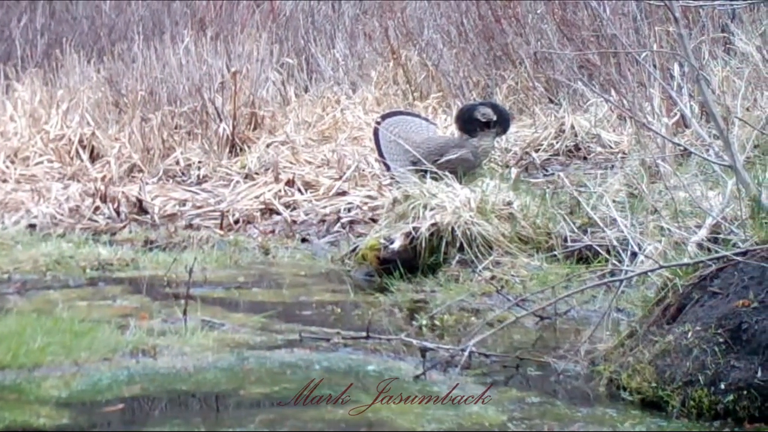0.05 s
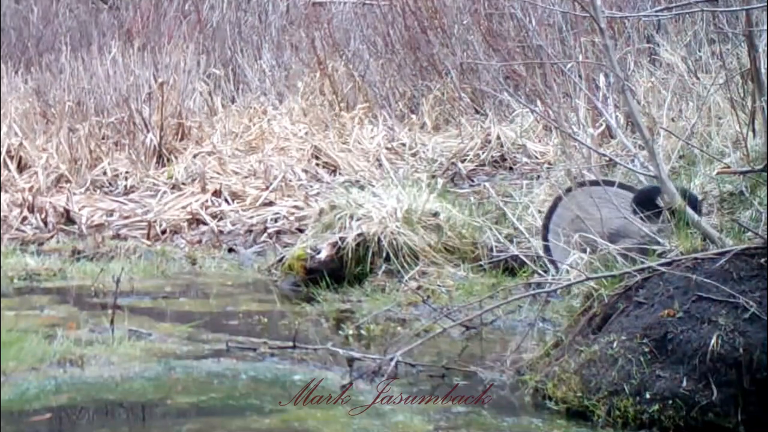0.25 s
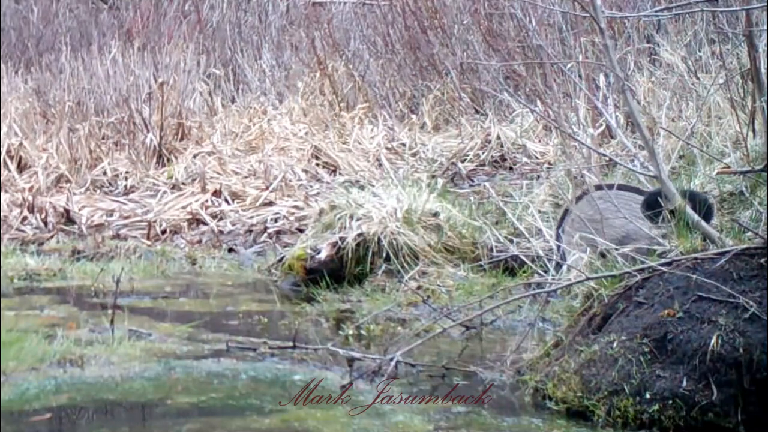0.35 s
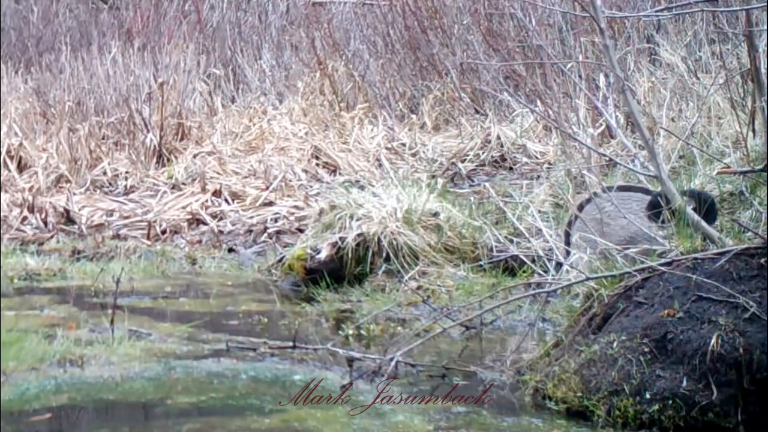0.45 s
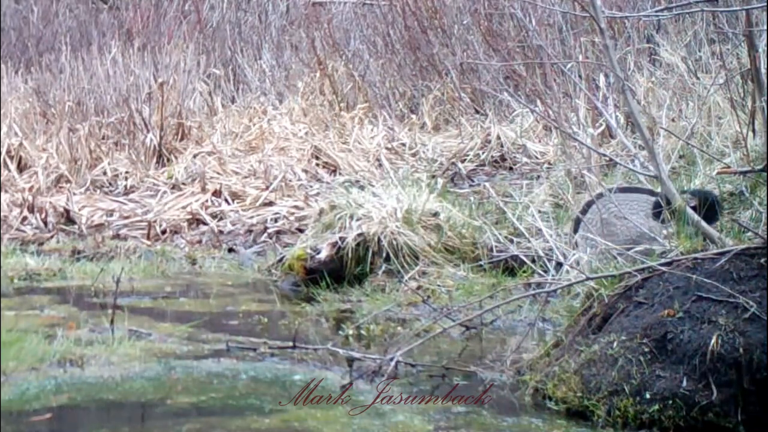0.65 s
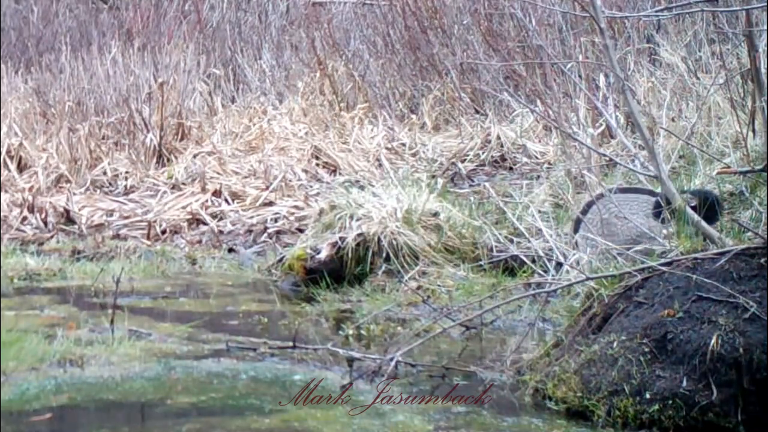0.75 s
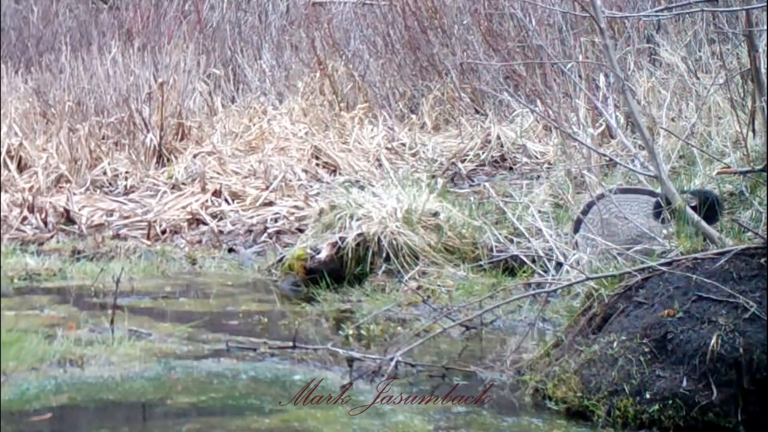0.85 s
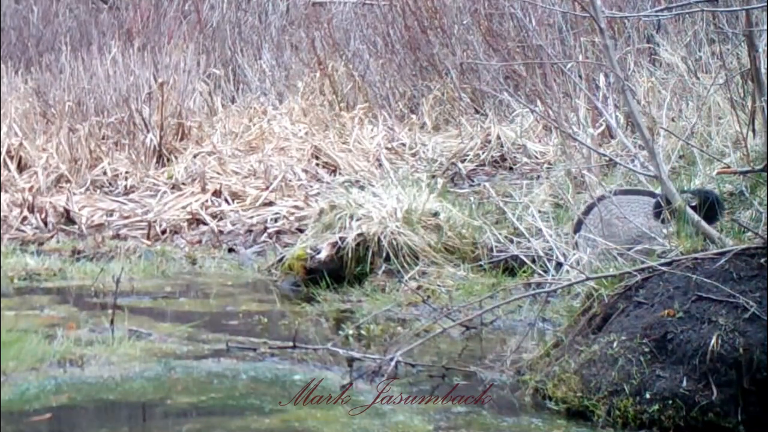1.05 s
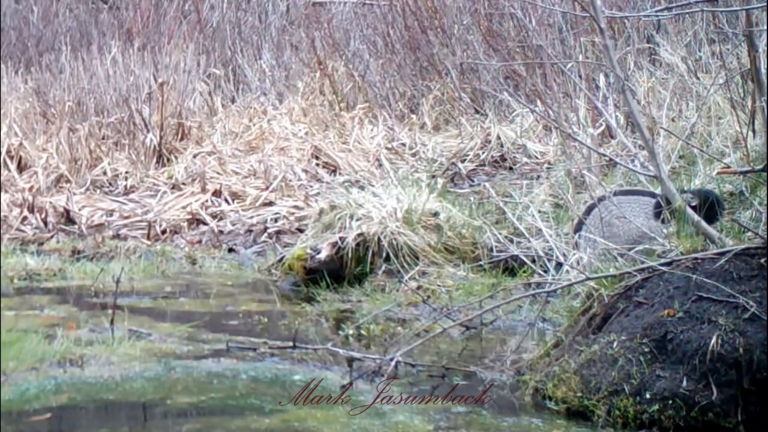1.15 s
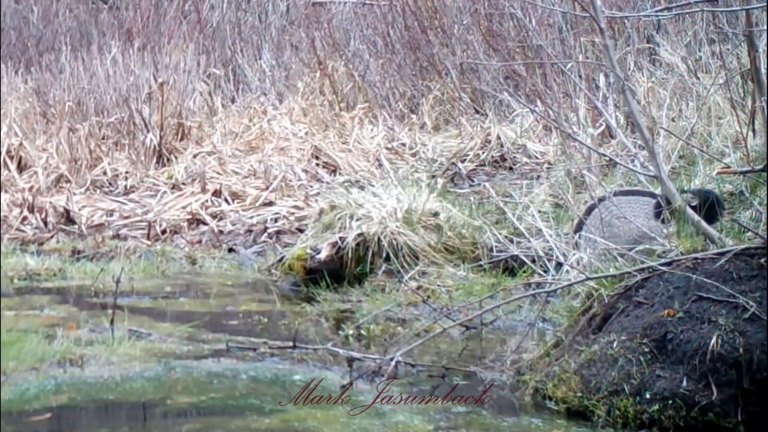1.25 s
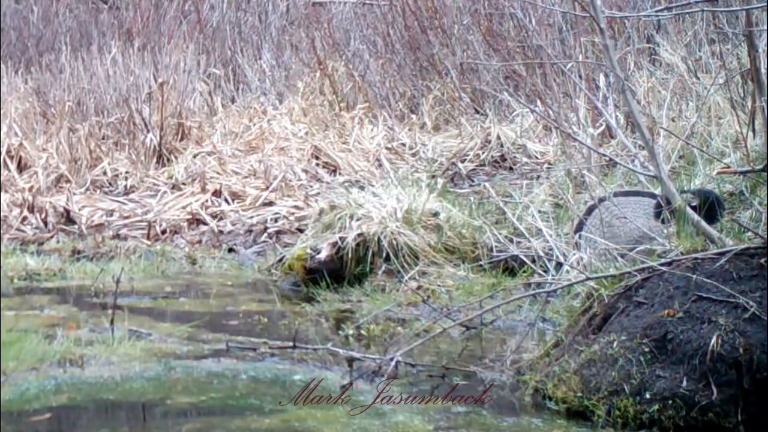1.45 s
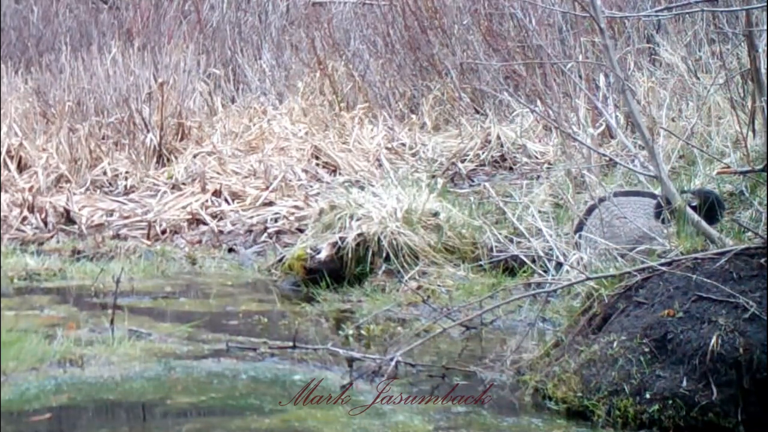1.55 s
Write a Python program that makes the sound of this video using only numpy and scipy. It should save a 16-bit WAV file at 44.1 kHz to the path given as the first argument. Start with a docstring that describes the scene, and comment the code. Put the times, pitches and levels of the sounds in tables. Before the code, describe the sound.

A grouse beats its wings five times in a quick, thumping, swishing flurry, then its steps crunch on through dry grass. A small bird whistles thin notes farther off, over soft outdoor air and faint trickling marsh water.

```python
"""A grouse rushes along a marsh edge with five wingbeats: each swishes the feathers and shoves a thump
of air. Its steps crunch through dry grass while a small bird whistles thin notes that echo off the trees.
Underneath lies a bed of outdoor air, trickling water and mains buzz. The recorder samples coarsely,
which mirrors the whistles into the treble.
An edit cuts the sound to silence for a moment just before the rush."""
import sys
import numpy as np
from scipy import signal
from scipy.fft import rfft, irfft
from scipy.io import wavfile

SR = 44100
rng = np.random.default_rng(int(sys.argv[2]) if len(sys.argv) > 2 else 0)


def store_wav(level_fs):
    """Save 16-bit WAV to argv[1]."""
    pcm = np.round(np.clip(np.atleast_2d(level_fs), -1, 1) * 32767)
    wavfile.write(sys.argv[1], SR, pcm.T.astype(np.int16))


N = 70560
T = np.arange(N) / SR

# tone of the outdoor air: frequency_hz, gain_db
AIR_EQ = [(25, 4.5), (70, 0.5), (130, 0), (250, -3), (450, -7.5), (900, -8), (1300, -11.5), (2000, -12.5),
          (3200, -17), (4000, -17)]
# partials of the mains buzz: harmonic_number, level_db
BUZZ_PARTIALS = [(4, -66), (5, -64.5), (6, -76.5), (7, -67), (8, -69), (9, -68), (10, -73), (11, -72),
                 (14, -68), (15, -81), (16, -75.5)]
# the small bird's phrase: start_s, end_s, pitch_hz, start_offset_hz, glide_s, level_db
WHISTLES = [(0.264, 0.345, 3211, 700.5, .007, -47), (0.387, 0.453, 3220, 99.5, 0.0064, -48),
            (0.541, 0.613, 3253, 599.5, .007, -47.5), (0.675, 0.71, 3272, -550, 0.00853, -44.5),
            (0.814, 0.891, 3284, 1250, .008, -47)]
# slapback off near trunks: delay_s, gain_db
TRUNK_ECHOES = [(0.042, -14), (.062, -15.5)]
# steps and snaps in dry grass: start_s, level_db, decay_s, centre_hz, crack_db
CRUNCHES = [(0.222, -36, 0.006, 600, -26), (0.307, -41, 0.0029, 1800, -11.5),
            (0.343, -33, 0.0028, 590, -13), (0.3782, -28.5, 0.0028, 813, -6.5),
            (0.509, -45, 0.002, 2400, -18), (0.549, -38, 0.012, 480, -12), (0.7000, -40, 0.0073, 1980, -28),
            (0.717, -36, 0.0032, 1400, 1), (0.782, -46, .004, 600, -10), (0.9365, -39, 0.015, 880, -17),
            (0.9845, -36.5, 0.0044, 1230, -22), (1.0753, -42.5, 0.0094, 1290, -11),
            (1.1031, -42, 0.0059, 1760, -22), (1.2402, -38, 0.0047, 1300, -8.5),
            (1.411, -51, 0.032, 1720, -22), (1.5203, -38, 0.0038, 1220, -27)]
# tone of brushed grass: frequency_hz, gain_db
GRASS_EQ = [(100, 6), (220, -10), (450, 6), (800, -8), (1400, -7.5), (2200, -13.5), (3000, -10),
            (4000, -14.5)]
# rumble of stirred air: frequency_hz, gain_db
EDDY_EQ = [(20, 0), (60, 7), (120, 2), (200, -13.5), (800, -54)]
# body of the feather swish: frequency_hz, gain_db
FEATHER_EQ = [(200, -3), (600, 2.5), (1000, 4.5), (1500, 4.5), (2300, 8.5), (3000, 1.5), (4000, -0.5)]
# hiss of the wing tips: frequency_hz, gain_db
TIP_EQ = [(1500, -31), (2700, -2.5), (3600, 3), (4000, 0.5)]
# wing strokes: time_s, thump_db, swish_db, swish_lead_s, swish_width_s, tip_db
WINGBEATS = [(0.2589, -28.5, -42, 0.014, 0.02, -51), (0.3323, -23.5, -43.5, 0.015, 0.025, -51),
             (0.414, -25, -43, 0.016, 0.012, -43.5), (0.4928, -26, -43, 0.02, 0.0091, -45.5),
             (0.558, -36, -46, 0.012, 0.0064, -46.5)]

SAMPLING_HZ = 8000  # the recorder's coarse rate


def undb(db):
    """Decibels to gain."""
    return 10 ** (np.asarray(db) / 20)


def unit(x):
    """Scale to rms 1."""
    return x / np.sqrt(np.mean(x ** 2) + 1e-20)


def shaped_noise(db_at):
    """Noise of rms 1 below half the coarse rate; db_at gives its tone over log2 of the frequency."""
    octave = np.log2(np.maximum(np.fft.rfftfreq(N, 1 / SR), 1))
    gain = undb(db_at(octave)) * (octave < np.log2(SAMPLING_HZ / 2))
    return unit(irfft(rfft(rng.standard_normal(N)) * gain, N))


def eq_noise(eq):
    """Noise of rms 1 coloured by an EQ table."""
    hz, db = np.array(eq, float).T
    return shaped_noise(lambda octave: np.interp(octave, np.log2(hz), db))


def wobble(rate_hz):
    """Random modulation: levels joined by lines, spread near 1."""
    return 0.968 * np.interp(T * rate_hz, np.arange(N), rng.standard_normal(N))


def grain(depth_db, rate_hz):
    """A jittering gain of rms 1 that roughens a layer."""
    return unit(undb(depth_db * wobble(rate_hz)))


def outdoor_air(level_db=-49, flicker_db=0.42):
    """A dark, steady bed of air whose level flickers slightly."""
    return undb(level_db) * eq_noise(AIR_EQ) * undb(flicker_db * wobble(39.64))


def mains_buzz(mains_hz=60):
    """A faint stack of mains harmonics."""
    return sum(np.sqrt(2) * undb(db) * np.cos(2 * np.pi * harmonic * mains_hz * T)
               for harmonic, db in BUZZ_PARTIALS)


def trickle(level_db=-54.5, plops_per_s=230, centre_hz=715, spread_octaves=1.146, decay_cycles=2):
    """Running water: a scatter of tiny plops, each a quickly damped sine."""
    water, age = np.zeros(2 * N), T[:N // 40]
    for when, pitch, size in rng.random((int(plops_per_s * N / SR), 3)):
        hz = centre_hz * 2 ** (spread_octaves * (2 * pitch - 1))
        gain = undb(-0.5 * np.log(max(size, .02)))
        plop = np.sin(2 * np.pi * hz * age) * np.exp(-age * hz / decay_cycles)
        start = int(when * N)
        water[start:start + len(age)] += gain * plop
    return undb(level_db) * unit(water[:N])


def songbird(sag_hz_per_s=674, swell_s=0.044, ramp_s=0.0064, waver_hz=13.8, flutter_db=1.5):
    """Pure whistles slide onto their pitch, swell, sag and stop."""
    song, waver = np.zeros(N), waver_hz * wobble(89.06)
    for start, end, hz, offset_hz, glide, db in WHISTLES:
        age = np.maximum(T - start, 0)
        pitch = hz + offset_hz * np.exp(-age / glide) - sag_hz_per_s * age + waver
        gate = np.clip(np.minimum(age, end - T + ramp_s / 2) / ramp_s, 0, 1)
        swell = np.minimum(0.34 + (age / swell_s) ** 2, 1)
        song += np.sqrt(2) * undb(db) * gate * swell * np.sin(2 * np.pi * np.cumsum(pitch) / SR)
    return song * undb(flutter_db * wobble(120.6))


def among_trees(song, tail_db=-8, t60_s=1, far_db=-13.5, far_delay_s=0.15, far_width_s=0.027):
    """The song with slapback off near trunks, a woodland tail and a blur returning from far trees."""
    slapback = sum(undb(db) * np.interp(T - delay, T, song, left=0) for delay, db in TRUNK_ECHOES)
    tail = undb(tail_db) * unit(np.exp(-np.log(1000) * T / t60_s))
    far = undb(far_db) * unit(np.exp(-.5 * ((T - far_delay_s) / far_width_s) ** 2))
    impulse_response = np.hypot(tail, far) * rng.standard_normal(N) / np.sqrt(N)
    return song + slapback + signal.fftconvolve(song, impulse_response)[:N]


def grass_steps(attack_s=0.001, width_octaves=0.52):
    """Dry stalks crunch underfoot: short bursts, each a band of colour over a broad crack."""
    steps = np.zeros(N)
    for start, db, decay, hz, crack_db in CRUNCHES:
        def tone_db(octave):
            band = np.exp(-.5 * ((octave - np.log2(hz)) / width_octaves) ** 2)
            return 10 * np.log10(band + undb(crack_db) ** 2)
        age = np.maximum(T - start, 0)
        envelope = (1 - np.exp(-age / attack_s)) * np.exp(-age / decay)
        steps += undb(db) * envelope * shaped_noise(tone_db)
    return steps * grain(depth_db=1, rate_hz=900)


def wake(start_s=0.24, end_s=0.5, grass_db=-44.5, grass_fade_s=0.13, eddy_db=-42.5, eddy_fade_s=0.12):
    """Brushed grass rustles and stirred air rumbles through the rush, then both settle."""
    settling = np.maximum(T - end_s, 0)
    rustle = eq_noise(GRASS_EQ) * grain(depth_db=3, rate_hz=200)
    grass = undb(grass_db) * np.exp(-settling / grass_fade_s) * rustle
    eddies = undb(eddy_db) * np.exp(-settling / eddy_fade_s) * eq_noise(EDDY_EQ)
    return (T > start_s) * (grass + eddies)


def wingbeats(suck_s=0.0062, turn_s=0.0024, push_s=0.0053, sway_s=0.022, sway_db=-38.5, tip_s=0.0062):
    """Each stroke swishes, hisses at the tips, draws air in and turns it into a thumping push."""
    air, swish, tips = np.zeros((3, N))
    for time, thump_db, swish_db, lead, width, tip_db in WINGBEATS:
        age = T - time
        suck, push = 0.78 * np.exp(-abs(age) / suck_s), np.exp(-abs(age) / push_s)
        air += 2 * undb(thump_db) * np.tanh(age / turn_s) * np.where(age < 0, suck, push)
        air += 2 * undb(sway_db) * age / sway_s * np.exp(-(age / sway_s) ** 2)  # slow swing of air
        swish += undb(swish_db) * np.exp(-.5 * ((age + lead) / width) ** 2)
        tips += undb(tip_db) * np.exp(-.5 * ((age + lead) / tip_s) ** 2)
    feathers = swish * eq_noise(FEATHER_EQ) + tips * eq_noise(TIP_EQ)
    return air + feathers * grain(depth_db=3, rate_hz=700)


def scene():
    """The mono mix: grouse in front, songbird in the trees, marsh bed underneath."""
    grouse = wingbeats() + wake() + grass_steps()
    return (grouse + among_trees(songbird()) + trickle() + outdoor_air() + mains_buzz())[None]


def record(dry, roll_off_hz=3670, top_hz=15700, cut_start_s=0.198, cut_end_s=0.2222):
    """Coarse samples joined by lines mirror the sound into the treble; an edit cuts a brief silence."""
    count = round(N * SAMPLING_HZ / SR)
    bins, times = np.arange(count // 2 + 1), np.arange(count) / SAMPLING_HZ
    roll_off = 1 / np.sqrt(1 + (bins * SR / N / roll_off_hz) ** 20)
    droop = np.sinc(bins / count) ** 2  # the lines dull the highs; dividing by this keeps them level
    coarse = irfft(rfft(dry[0])[bins] * roll_off / droop, count) * count / N
    edit_gate = (times < cut_start_s) | (times > cut_end_s)
    joined = np.interp(T, times, coarse * edit_gate)
    high_cut = signal.ellip(10, .1, 70, top_hz, fs=SR, output="sos")
    return signal.sosfilt(high_cut, joined)[None]


dry = scene()
out = record(dry)
store_wav(out)
```